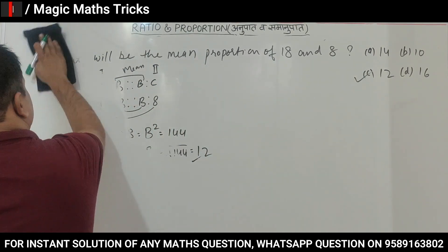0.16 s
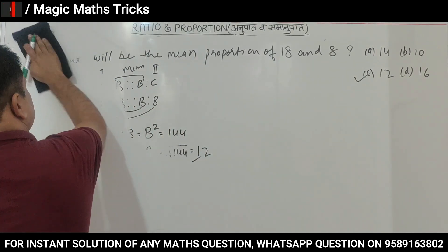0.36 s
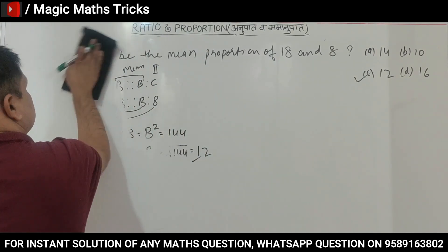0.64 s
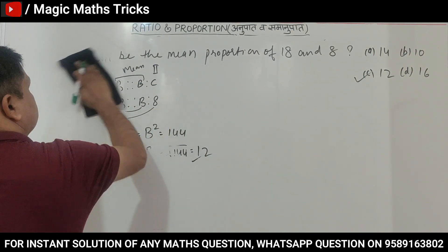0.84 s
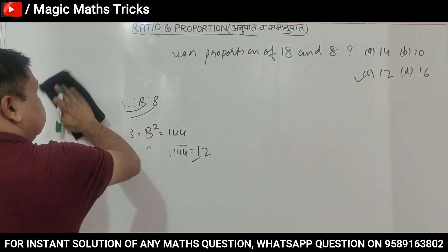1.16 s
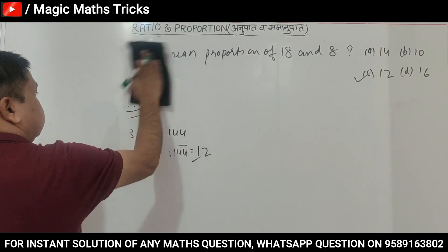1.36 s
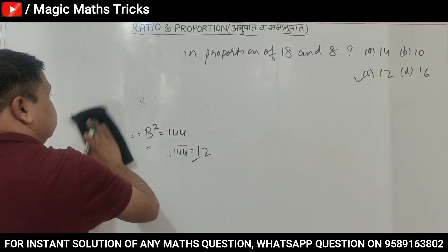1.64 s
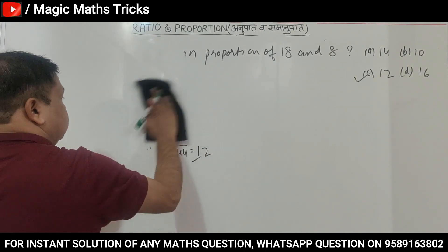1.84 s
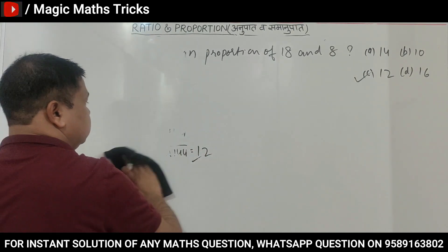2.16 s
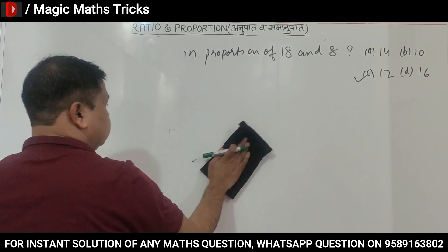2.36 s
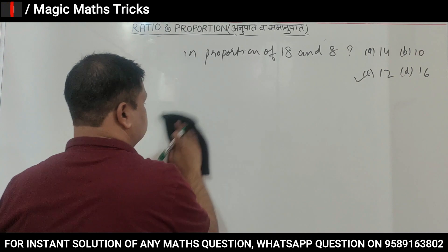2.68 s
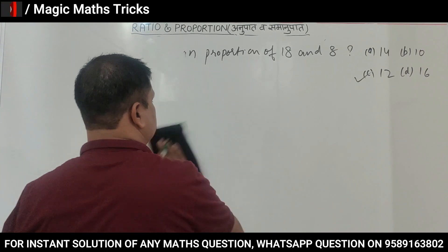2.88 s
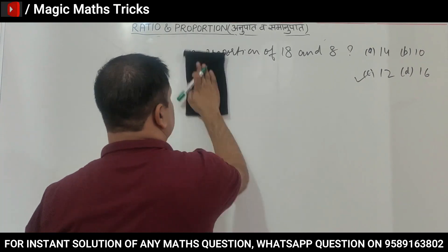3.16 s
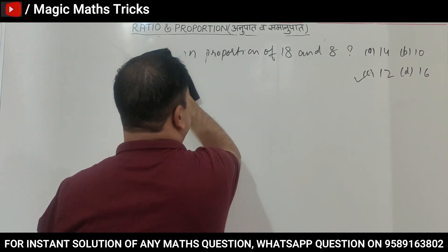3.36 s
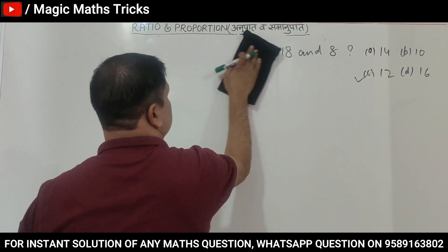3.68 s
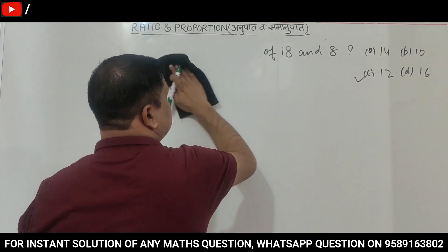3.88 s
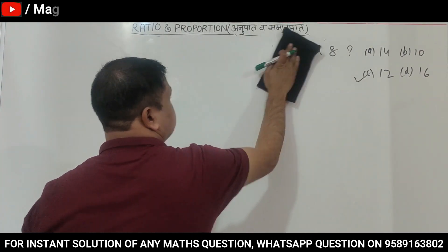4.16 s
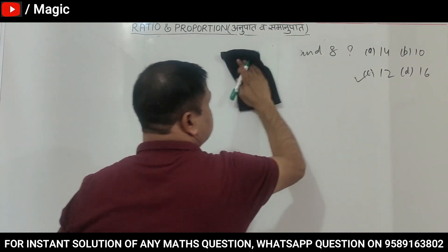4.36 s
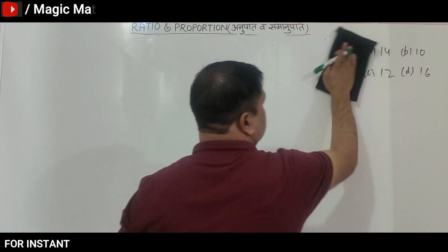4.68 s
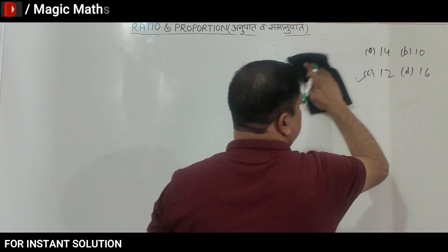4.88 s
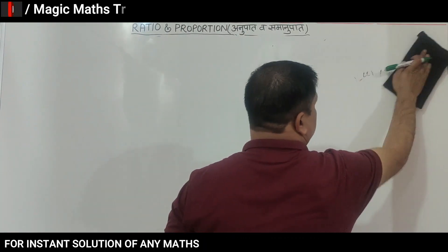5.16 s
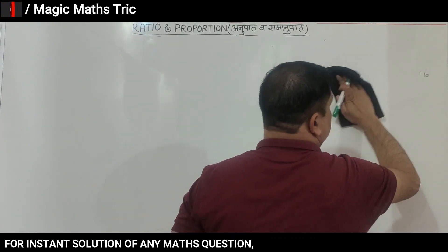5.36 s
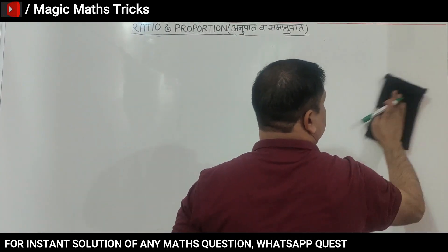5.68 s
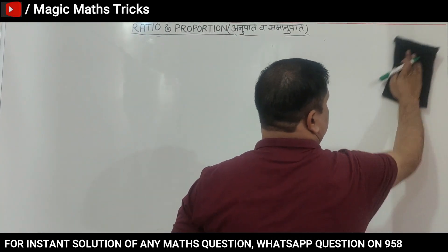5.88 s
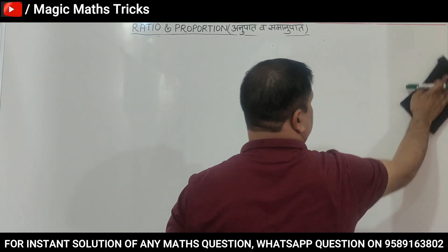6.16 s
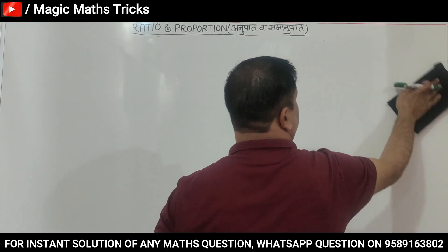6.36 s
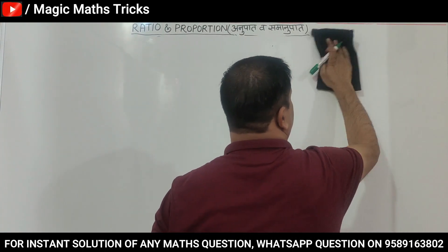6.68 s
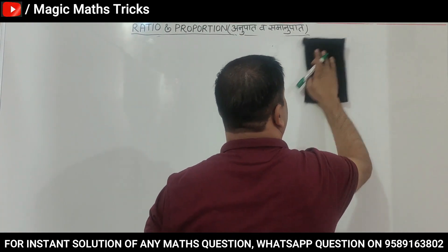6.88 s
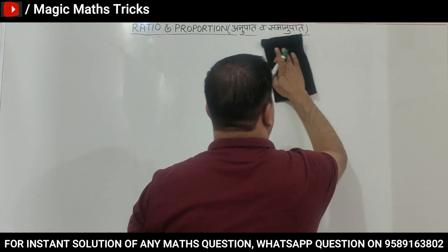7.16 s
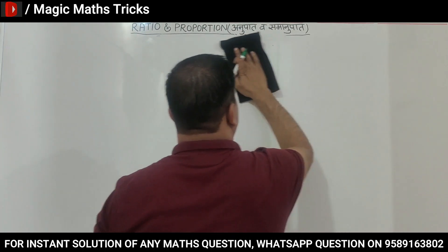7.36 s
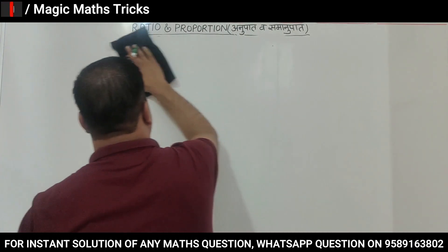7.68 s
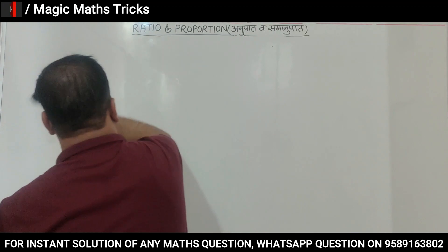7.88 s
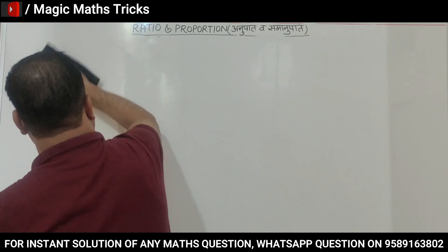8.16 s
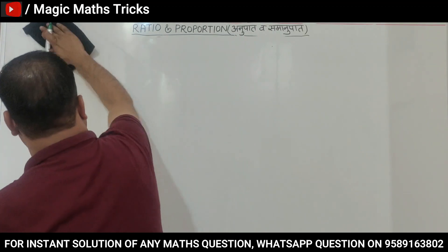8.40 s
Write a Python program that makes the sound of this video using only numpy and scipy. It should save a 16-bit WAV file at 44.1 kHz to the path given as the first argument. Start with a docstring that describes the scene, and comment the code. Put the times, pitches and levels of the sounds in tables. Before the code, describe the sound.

A felt duster wipes a whiteboard in a small, quiet classroom. A loud, bright clack comes almost at once, then soft to-and-fro rubbing. A flat, thumpier knock lands near three seconds, a lighter one a second later, then faint taps, a tiny squeak, and a final firm hollow knock near the end. A phone records in stereo over a low, steady murmur and hiss.

```python
"""A felt duster is wiped over a whiteboard in a small classroom, by a hand that also holds a marker pen.
The felt is coloured noise that follows the speed of each stroke, and its drag makes the board rumble.
Now and then duster and marker knock on the board: damped modes and dense bands ring, and the room spreads them.
A few gliding sine tones are stick-slip squeaks. A phone with two microphone ports listens over a quiet,
nearly steady noise floor."""
import sys
import numpy as np
from scipy import signal
from scipy.fft import rfft, irfft
from scipy.io import wavfile
from scipy.ndimage import uniform_filter1d

SR = 44100
rng = np.random.default_rng(int(sys.argv[2]) if len(sys.argv) > 2 else 0)


def log_audio(samples):
    """Write samples as a 16-bit WAV file to the path given in sys.argv[1]."""
    # one column per channel
    frames = np.atleast_2d(samples).T
    # limit to full scale, then quantise
    limited = np.clip(frames, -1, 1)
    pcm = np.round(limited * 32767).astype(np.int16)
    wavfile.write(sys.argv[1], SR, pcm)


N = 376173  # length of the scene in samples

# Separately placed strokes of the felt, most of them firm.
# Each row: time of full speed in seconds, hiss level in dB.
PLACED_STROKES = [(.03, -64.5), (.87, -75), (1.18, -65), (1.319, -68), (1.65, -67.5), (2.099, -67.5),
                  (2.28, -69.5), (2.55, -67.5), (3.17, -70.5), (3.73, -66), (4.1, -71.5), (5.229, -62.5),
                  (5.77, -63.5), (6.38, -57.5), (8.2, -67)]
# Spectrum of the felt's hiss. Each row: frequency in Hz, relative level in dB.
FELT_SPECTRUM = [(200, -22), (1300, -19), (2300, 0.5), (3600, 4.5), (4400, -4), (5400, 6.5), (7200, -16),
                 (10000, -8), (13500, -8), (15500, -6)]
# Spectrum of the board's rumble under the drag. Each row: frequency in Hz, relative level in dB.
RUMBLE_SPECTRUM = [(30, -12.5), (60, 2.5), (150, -7), (250, 5), (330, -7), (600, -9.5), (1200, -16.5),
                   (4000, -39)]
# Rumble under a light stroke, as the hand travels over the board. Each row: time in seconds, level in dB.
RUMBLE_LEVEL = [(0, -76), (.6, -78.5), (1.3, -75.5), (2.3, -72), (2.6, -64), (3.3, -66.5), (3.8, -75.5),
                (5.3, -70), (6.3, -71.5), (7.2, -79.5), (8.5, -78.5)]
# The left port is brighter. Each row: frequency in Hz, left minus right in dB.
PORT_SHADOW = [(300, 1), (2500, -1), (5300, 0.5), (6600, 10), (10500, 17.5), (12400, 5), (14200, 10.5)]
# Tilt of rumble and room tone between the ports. Each row: frequency in Hz, left minus right in dB.
FLOOR_TILT = [(60, 1.5), (700, 0.5), (3000, -1), (5000, -1), (6500, 3), (10000, 1), (13000, -2)]
STROKE_HALF_S = .056  # a stroke speeds up and slows down over about this time
RUMBLE_FOLLOW = 0.51  # dB of rumble per dB of hiss
LIGHT_DB = -74.5  # hiss of the light strokes


def wiping():
    """Friction noise: the felt hisses with stroke speed, catching unevenly; its drag makes the board rumble."""
    t = np.arange(N) / SR
    rub, drag = 0, 0
    for s, db in PLACED_STROKES + light_strokes():
        speed = np.exp(-.5 * np.minimum(np.abs(t - s) / STROKE_HALF_S, 10) ** 2)
        rub = np.hypot(rub, undb(db) * speed)
        drag_over_light = undb(RUMBLE_FOLLOW * (db - LIGHT_DB))
        drag = np.maximum(drag, drag_over_light * speed)
    times, levels_db = np.transpose(RUMBLE_LEVEL)
    drag = drag * undb(np.interp(t, times, levels_db))
    catching = undb(1.1 * walk(rate=46))
    felt = flutter(hiss(FELT_SPECTRUM, PORT_SHADOW), depth_db=1.5)
    rumble = hiss(RUMBLE_SPECTRUM, FLOOR_TILT)
    return catching * (rub * felt + drag * rumble)


LIGHT_EVERY_S, LIGHT_JITTER_S = .22, .03  # spacing of the light strokes and its scatter


def light_strokes(count=48):
    """Near-periodic excitation: the hand keeps going to and fro; rows of (seconds, hiss dB)."""
    lateness = rng.standard_normal(count)
    return [(k * LIGHT_EVERY_S + LIGHT_JITTER_S * late, LIGHT_DB) for k, late in enumerate(lateness)]


def flutter(x, depth_db):
    """Patchy friction: bits of felt grip and let go, so each stretch of the spectrum swells and fades alone."""
    frames = signal.stft(x, nperseg=512)[2]
    patches = rng.standard_normal(frames.shape[1:])
    patches = uniform_filter1d(patches, size=3, axis=0)  # over frequency
    patches = uniform_filter1d(patches, size=5, axis=1)  # over time
    return unit(signal.istft(frames * undb(depth_db * unit(patches)))[1][:, :N])


# Blows of duster and marker; edge, flat and body are 0 for a usual blow, and the grip retunes the marker.
# Each row: start in seconds, strength in dB, landing on an edge in dB, landing flat in dB,
# ring of the duster's body in dB, share of the marker in dB, marker pitch in Hz.
KNOCKS = [ (0.131, -25, 8.5, 3, -6, -12.5, 2684), (2.8197, -36, -11, 13, -2.5, -2.5, 2597),
          (3.8060, -44.5, 6.5, -1.5, -2, -7, 2370), (4.2878, -58.5, -0.5, 1, -20, -8.5, 2350),
          (4.7155, -56, -5, 3, -10.5, -7, 2960), (5.5779, -53, 7, 11.5, -19.5, -3.5, 2070),
          (5.845, -71, -9.5, 6, 13, 17.5, 2416), (6.115, -47, 3.5, -13, 3, 5.5, 2412),
          (6.9007, -49, -12.5, -15, 2, -0.5, 2350), (7.7172, -37.5, 4.5, -4, 4.5, -12, 2490), ]
# Hard contact between duster and board. Each row: frequency in Hz, nominal width in Hz, relative level in dB.
CLACK_MODES = [(1654, 100, -9), (1968, 100, -3), (2340, 130, 0), (2604, 170, 3), (2870, 390, -2),
               (3255, 80, -0.5), (3580, 140, 0), (3940, 55, 1.5), (3930, 140, 0), (3963, 60, -2),
               (4330, 66, -6), (4630, 90, -2.5), (4890, 340, -2.5), (5840, 300, -12), (6290, 420, -13),
               (6200, 73, -15.5)]
# The whole board on its backing. Each row: frequency in Hz, nominal width in Hz, relative level in dB.
THUMP_MODES = [(244, 18, -10.5), (241.5, 10, 5.5)]
# The board's densely packed modes. Each row: frequency in Hz, relative level in dB.
PANEL_SPECTRUM = [(20, -34.5), (60, -15), (150, -21), (320, -8.5), (470, -4), (620, -4), (780, -3),
                  (1020, 1), (1190, -2), (1320, -5.5), (1480, -4), (2400, -11.5), (5000, -32),
                  (12000, -54.5)]
# The body of the duster. Each row: frequency in Hz, nominal width in Hz, relative level in dB.
HOLLOW_MODES = [(855, 32, 0.0018)]
# The marker's close modes. Each row: multiple of its pitch, nominal width in Hz, relative level in dB.
MARKER_MODES = [(.97, 70, -7), (1, 70, -0.5), (1.17, 89.7, -4.5)]
# Noisy treble of the blow. Each row: frequency in Hz, relative level in dB.
TICK_SPECTRUM = [(2000, -37.5), (5500, -11.5), (6800, -5.5), (8200, -1), (10300, 3.5), (11800, -6),
                 (13000, -10), (15500, -19)]
# Small hard parts meeting. Each row: frequency in Hz, nominal width in Hz, relative level in dB.
PING_MODES = [(13930, 440, -1), (14100, 230, -6.5), (13900, 250, -7)]
# what a usual blow gives each part, relative to its clack (dB)
THUMP_DB, PANEL_DB, HOLLOW_DB, OVERTONE_DB, TICK_DB, PING_DB = -21, -6.5, -10.5, -9, -16.5, -29.5
RATTLE_ABOVE_DB, RATTLE_GROWTH = -34.5, 3.1  # past this strength the ping gains this many extra dB per dB
TAIL_LENGTH, TAIL_LOSS_PER_DB = 0.82, .018  # relative length of the tail; a tap of the marker dies sooner
# the grip retunes the overtone less than the main pitch: exponent OVERTONE_GIVE
USUAL_MARKER_HZ, OVERTONE_HZ, OVERTONE_GIVE, OVERTONE_WIDTH_HZ = 2370, 5170, 0.44, 160
# past this share the marker lands first, and the panel loses this many dB per dB
MARKER_FIRST_DB, PANEL_SPARED = 1.5, 5.5
# dB per dB: the overtone follows the marker, a flat landing mutes it; an edge spares the panel
OVERTONE_FOLLOW, FLAT_MUTES, EDGE_SPARES = .5, 0.22, 0.21


def knocks(size=22050):
    """Impact excitation: how a blow lands weights the modes; levels are rms over a tenth of a second."""
    out = np.zeros((2, N))
    for s, strength_db, edge_db, flat_db, body_db, marker_db, marker_hz in KNOCKS:
        marker = [(multiple * marker_hz, width, db) for multiple, width, db in MARKER_MODES]
        overtone_hz = OVERTONE_HZ * (marker_hz / USUAL_MARKER_HZ) ** OVERTONE_GIVE
        overtone = [(overtone_hz, OVERTONE_WIDTH_HZ, 0)]
        panel_loss_db = EDGE_SPARES * edge_db + PANEL_SPARED * max(marker_db - MARKER_FIRST_DB, 0)
        overtone_db = OVERTONE_DB + OVERTONE_FOLLOW * marker_db - FLAT_MUTES * flat_db
        rattle_db = RATTLE_GROWTH * max(strength_db - RATTLE_ABOVE_DB, 0)
        parts = [
            (ring(CLACK_MODES, size), 0),
            (ring(THUMP_MODES, size), THUMP_DB + flat_db),
            (colour(PANEL_SPECTRUM, size), PANEL_DB - panel_loss_db),
            (ring(HOLLOW_MODES, size), HOLLOW_DB + body_db),
            (ring(marker, size), marker_db),
            (ring(overtone, size), overtone_db),
            (colour(TICK_SPECTRUM, size), TICK_DB + edge_db),
            (ring(PING_MODES, size), PING_DB + rattle_db),
        ]
        length = TAIL_LENGTH * np.exp(-TAIL_LOSS_PER_DB * marker_db)
        blow = sum(undb(strength_db + db) * part * spread(length, size) for part, db in parts)
        add(out, s, blow * np.sqrt(SR / 10))
    return out


SKIRT = 0.2526  # extra steepness of a resonance's flanks


def ring(modes, size):
    """Modal response: damped resonances, weighted a little differently as every blow lands elsewhere."""
    f = bins(size) + 1e-3
    power = 0
    for hz, width, db in modes:
        detuning = (f / hz - hz / f) * hz / width
        # the skirts fall off faster than a lone mode's
        power = power + undb(db + rng.standard_normal()) ** 2 / (1 + detuning ** 2) ** (1 + SKIRT)
    return causal(np.sqrt(power))


PATCHY_DB = 2  # unevenness of densely packed modes


def colour(points, size):
    """Modal overlap: densely packed modes merge into a broad spectrum with chance clusters."""
    f = bins(size)
    clusters = np.interp(f / 110, np.arange(400), rng.standard_normal(400))  # one draw every 110 Hz
    return causal(undb(along(points, f) + PATCHY_DB * clusters))


# Ring of board and room; a bend over 1 holds on, then drops. Each row: band centre in Hz, build-up in seconds,
# time to fall 60 dB in seconds at relative length 1, bend as an exponent without unit.
ROOM_BANDS = [(100.5, 0.012, .25, 1.5), (239.8, 0.0061, 0.18, 2), (500, .005, .23, 1.8),
              (910, .005, 0.25, 1.3), (2410, 0.0022, 0.27, 1.0), (4500, 0.0011, 0.26, 1.2),
              (8020, .001, .23, 1.1), (14000, .001, .19, 1)]
# First arrivals at the ports. Each row: delay in seconds, relative level in dB.
ARRIVALS = [(0, 0), (.0038, -7.5)]
# The knocks' thump reaches both ports alike. Each row: frequency in Hz, side minus mid in dB.
KNOCK_WIDTH = [(60, -6), (220, -9.5), (380, -5), (700, 0), (1290, 3.5), (2380, -2.5), (4400, -3), (8000, 0)]
DIRECT_DB, CONTACT_S = 12, 0.0014  # strength and decay time of the contact burst
BITE_S = 0.00057  # time the contact takes to build up


def spread(length, size):
    """Direct and reverberant sound: contact burst, an early bounce, then a tail whose lows swell late."""
    t, f = np.arange(size) / SR, bins(size)
    noise = rfft(rng.standard_normal((2, size)))
    first = 0
    for s, db in ARRIVALS:
        first = first + undb(DIRECT_DB + db) * (t >= s) * np.exp(-np.abs(t - s) / CONTACT_S)
    first = first * (1 - np.exp(-t / BITE_S))
    centres = np.log([row[0] for row in ROOM_BANDS])
    out = 0
    for pick, (hz, rise, t60, bend) in zip(np.eye(len(ROOM_BANDS)), ROOM_BANDS):
        band = irfft(noise * np.interp(np.log(f + 1), centres, pick))
        decay = np.exp(-np.log(1000) * (t / (t60 * length)) ** bend)
        tail = (1 - np.exp(-t / rise)) * decay
        # mostly the treble radiates straight from the point of contact
        shape = np.hypot(tail, first * hz ** 2 / (hz ** 2 + 1300 ** 2))
        out = out + band * unit(shape)
    out = rfft(out)
    # the many paths share the energy evenly over each stretch of the spectrum
    energy = uniform_filter1d(uniform_filter1d(np.abs(out) ** 2, size=61), size=61)
    out = out / np.sqrt(energy)
    return ports(*out, KNOCK_WIDTH, size) * balance(PORT_SHADOW, size)


# Squeaks of the rubbing duster. Each row: start in seconds, length in seconds, start pitch in Hz,
# end pitch in Hz, level at mid-squeak before the room in dB, unsteadiness as a fraction of the pitch.
SQUEAKS = [(2.52, 0.046, 3970, 3830, -66.5, 0), (3.148, 0.044, 2367, 2400, -68.5, 0.02),
           (4.764, 0.0313, 2330, 2050, -53.5, 0.07), (5.74, 0.044, 2920, 2810, -68, .035)]


def squeaks(size=22050):
    """Stick-slip oscillation: the duster sticks and slips at a gliding, unsteady rate; the room carries it on."""
    out, t = np.zeros((2, N)), np.arange(size) / SR
    for s, length, start_hz, end_hz, db, unsteady in SQUEAKS:
        progress = np.clip(t / length, 0, 1)
        glide_hz = start_hz + (end_hz - start_hz) * progress
        hz = glide_hz * (1 + unsteady * walk(rate=370)[:size])
        swell = undb(db) * np.sqrt(2) * np.sin(np.pi * progress)
        tone = swell * np.sin(2 * np.pi * np.cumsum(hz) / SR)
        add(out, s, rfft(tone) * spread(0.84, size))
    return out


# Spectrum of room murmur and microphone hiss. Each row: frequency in Hz, relative level in dB.
FLOOR_SPECTRUM = [(15, -39), (25, -22), (69, -1.5), (99, -8), (188, -11), (240, -12.5), (389, -12),
                  (433, -12.5), (537, -14), (598, -13), (1450, -24.5), (2230, -18.5), (5280, -24),
                  (9050, -36), (12500, -26), (15500, -25)]
FLOOR_DB = -63.5


def room_tone():
    """Stationary background noise: low room murmur and microphone hiss, barely wavering."""
    return undb(FLOOR_DB + .3 * walk(rate=5.1)) * hiss(FLOOR_SPECTRUM, FLOOR_TILT)


# Steady noise at the two ports. Each row: frequency in Hz, side minus mid in dB.
HISS_WIDTH = [(30, -4.5), (110, -4), (200, -2), (380, 3), (700, 3), (1290, 3), (2380, -3), (4400, -2.5),
              (8000, 1.5)]


def hiss(points, tilt):
    """Diffuse field: steady stereo noise of a given colour, rms 1."""
    noise = ports(*rfft(rng.standard_normal((2, N))), HISS_WIDTH, N)
    return unit(irfft(noise * undb(along(points, bins(N))) * balance(tilt, N), N))


def ports(mid, side, width, size):
    """Spatial coherence: spectra of diffuse sound at two ports, alike in the bass, opposed near 1 kHz."""
    share = undb(along(width, bins(size)))
    return np.array([mid + share * side, mid - share * side]) / np.sqrt(1 + share ** 2)


def balance(points, size):
    """Level difference between ports: left and right gains that keep the total power."""
    lean = undb(along(points, bins(size)))
    return np.array([lean, np.ones_like(lean)]) * np.sqrt(2 / (1 + lean ** 2))


def causal(gain):
    """Minimum phase: a response that starts at once, from the folded cepstrum of its spectrum; rms 1."""
    cepstrum = irfft(np.log(gain + 1e-9))
    cepstrum[1:len(gain) - 1] *= 2
    cepstrum[len(gain):] = 0
    return unit(np.exp(rfft(cepstrum)))


def walk(rate):
    """Slow modulation: interpolated chance values, spread near 1, with rate new values a second."""
    knots = rng.standard_normal(N // 100)
    return np.interp(np.arange(N) / SR * rate, np.arange(len(knots)), knots)


def add(out, s, spectrum):
    """Superposition: mix a short sound, given as its spectrum, in at time s."""
    sound = irfft(spectrum)
    start = int(s * SR)
    count = min(sound.shape[1] * 4 // 5, N - start)  # the last fifth is left out
    out[:, start:start + count] += sound[:, :count]


def undb(db):
    """Level to amplitude: decibels to gain."""
    return 10 ** (np.asarray(db) / 20)


def along(points, hz, axis=1):
    """Logarithmic frequency scale: read one column of a table over log frequency."""
    points = np.array(points, float)
    return np.interp(np.log(hz + 1e-3), np.log(points[:, 0]), points[:, axis])


def bins(size):
    """Discrete spectrum: frequencies in Hz for that many samples."""
    return np.arange(size // 2 + 1) * SR / size


def unit(x):
    """Effective value: scale to rms 1."""
    return x / np.sqrt(np.mean(np.abs(x) ** 2))


def scene():
    """Superposition of sources: wiping, knocks and squeaks over the quiet room."""
    return wiping() + knocks() + squeaks() + room_tone()


TOP_HZ = 15700


def record(dry):
    """Band limitation: the phone cuts the top with a steep elliptic low-pass."""
    lowpass = signal.ellip(10, .2, 70, TOP_HZ, fs=SR, output="sos")
    return signal.sosfilt(lowpass, dry)


dry = scene()
out = record(dry)
log_audio(out)
```